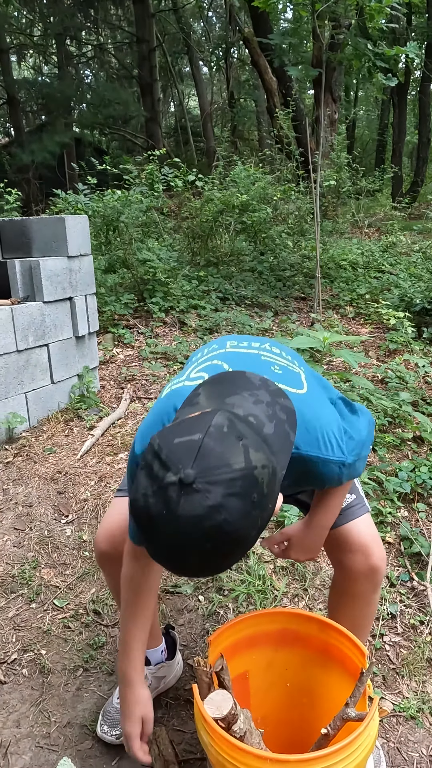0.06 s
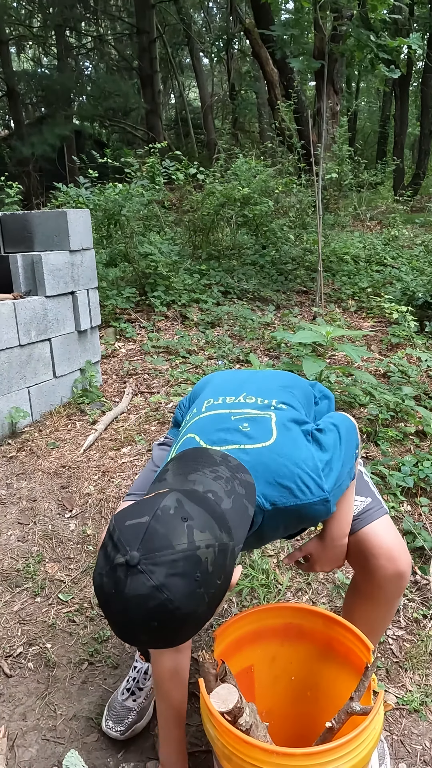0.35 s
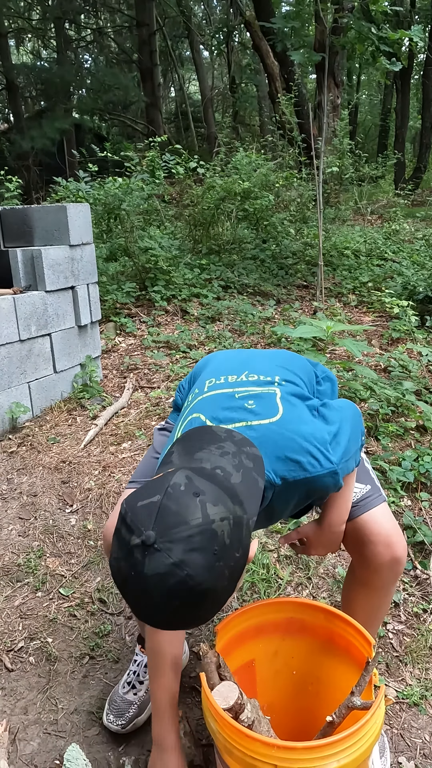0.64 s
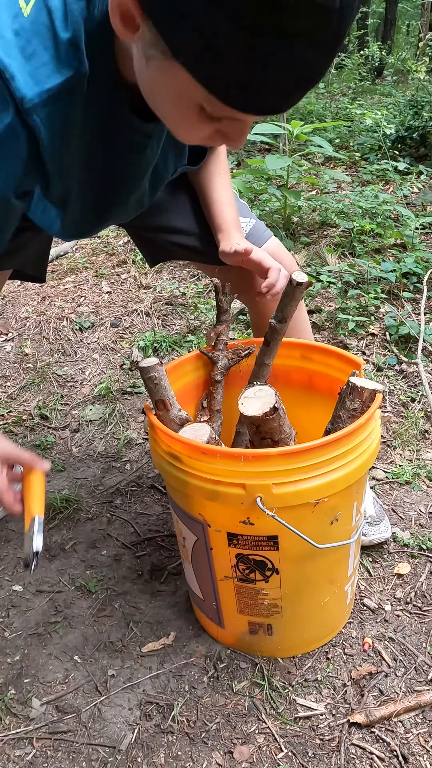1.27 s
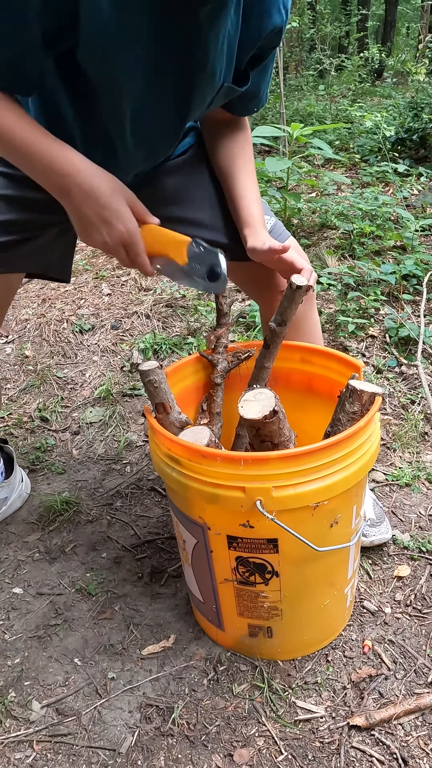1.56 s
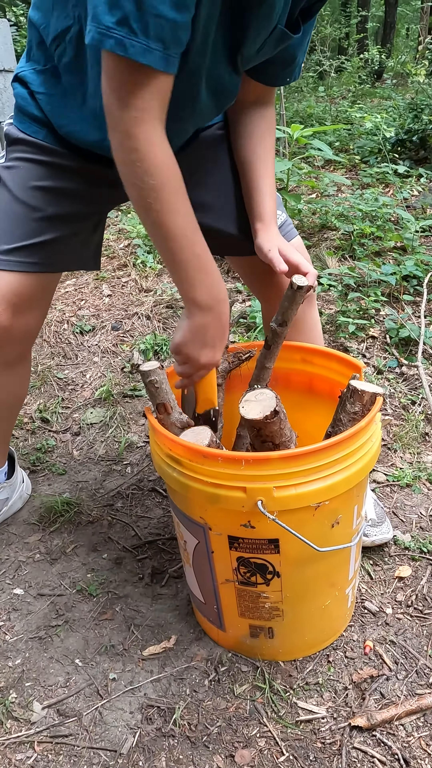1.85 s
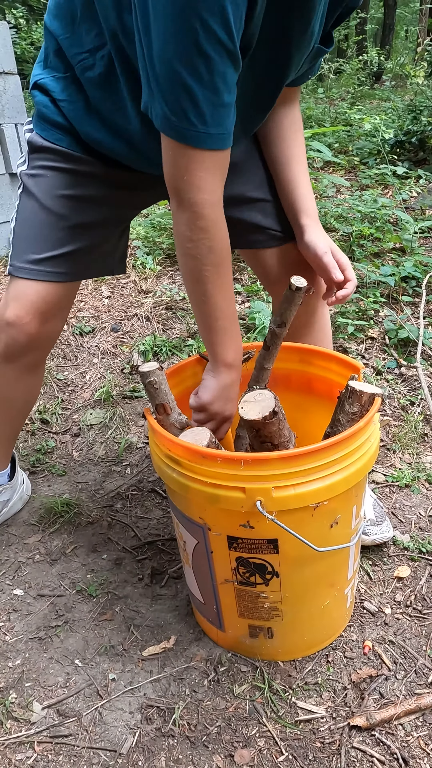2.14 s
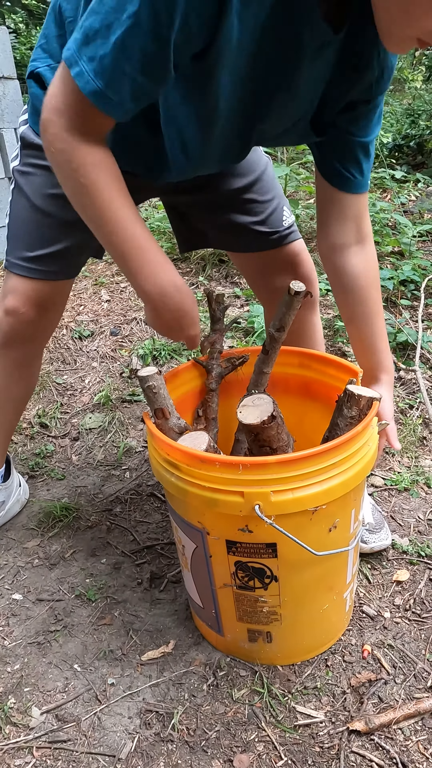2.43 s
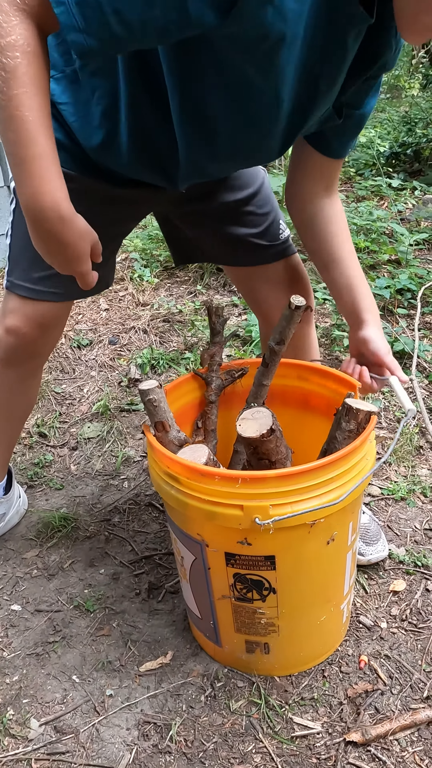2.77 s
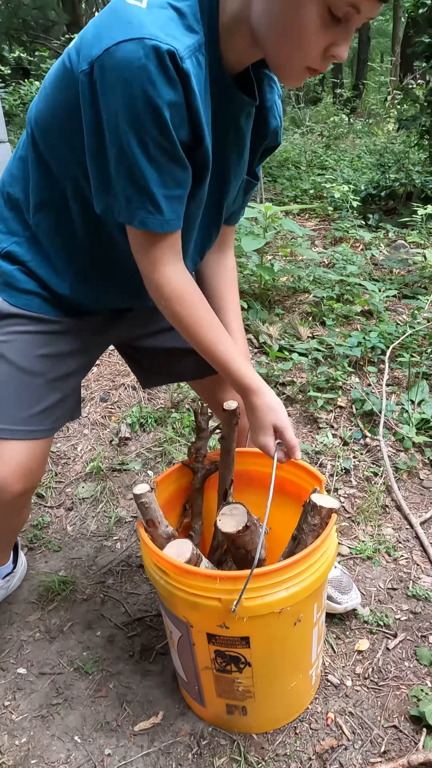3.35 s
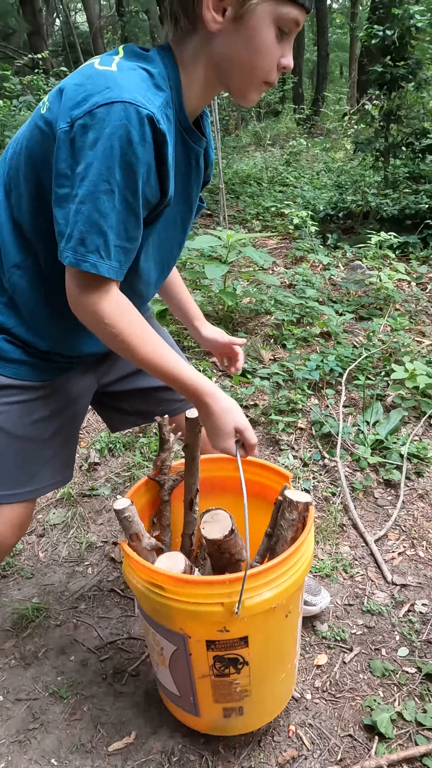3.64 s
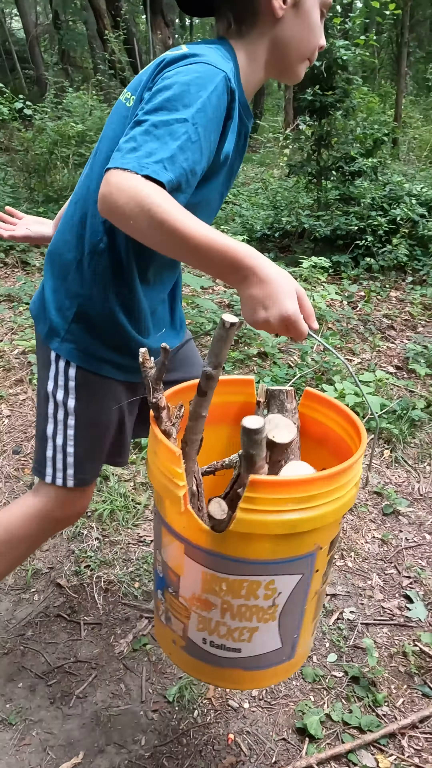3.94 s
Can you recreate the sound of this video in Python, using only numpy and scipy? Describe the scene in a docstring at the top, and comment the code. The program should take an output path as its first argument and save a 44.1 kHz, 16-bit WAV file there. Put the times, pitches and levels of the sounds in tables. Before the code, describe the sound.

Wood drops hollowly into a plastic bucket, then sticks knock, scrape and rattle the wire handle.

```python
"""Wood drops with a hollow thump into a plastic bucket on a forest floor, close to the microphone.
More cut sticks are packed in: they knock and scrape on the wall, the wire handle clatters as it is
raised, and the load shifts. Around the bucket dry leaves rustle and feet thud; one short, dry click
sounds near the end. Low wind rumbles on the microphone; farther off are a faint echo and the hush
of the woods."""
import sys
import numpy as np
from scipy import signal
from scipy.fft import rfft, irfft, next_fast_len
from scipy.io import wavfile
from scipy.ndimage import map_coordinates

SR = 44100
rng = np.random.default_rng(int(sys.argv[2]) if len(sys.argv) > 2 else 0)


def put_to_file(sound):
    """Save the sound as 16-bit audio at rate SR, in the file named by the first command-line argument."""
    columns = np.atleast_2d(sound).T  # one column per channel
    safe = np.clip(columns, -1, 1)
    whole_steps = np.round(safe * 32767)
    wavfile.write(sys.argv[1], SR, whole_steps.astype(np.int16))


N = 176400
BLOW_SAMPLES = 16384
T = np.arange(BLOW_SAMPLES) / SR

# heavy wood landing (time [s], clack [dB], tilt [dB/octave], boom [dB], chatter against clack [dB])
DROPS = [(0.037, -20.5, -5.5, -9.5, -42), (0.188, -20, -4.5, -15, -17), (.247, -39.5, -3, -24, -8),
         (.582, -33, -0.5, -21.5, -28), (.600, -42.5, 7, -19.5, -28), (2.459, -22.5, -2.5, -13, -16),
         (2.57, -23.5, -4, -17.5, -9.5)]
# sticks knocking on the wall and each other (time [s], level [dB], pitch [Hz])
KNOCKS = [(.224, -36.5, 3350), (0.615, -33.5, 3070), (2.307, -44, 2330), (2.656, -28, 1035),
          (2.709, -24.5, 2945), (2.719, -19.5, 1430), (2.879, -30.5, 1240), (2.971, -28.5, 1824),
          (3.059, -24.5, 600), (3.069, -21.5, 1323), (3.168, -38, 1700), (3.203, -37, 1630),
          (3.25, -36, 864), (3.354, -24.5, 933), (3.384, -32, 1090), (3.442, -32.5, 1764),
          (3.467, -27.5, 890), (3.476, -22, 1892), (3.586, -25, 1020), (3.886, -37.5, 1035)]
# the wire handle slipping in its sockets (time [s], level [dB])
HANDLE_SLIPS = [(2.568, -28), (2.714, -28), (2.719, -34), (2.737, -34.5), (2.756, -34.5), (2.793, -32.5),
                (2.817, -39), (2.888, -47), (2.941, -41), (2.992, -45.5), (3.083, -31.5), (3.103, -38.5),
                (3.322, -36), (3.35, -35.5)]
# sticks scraping along the wall as the load shifts (time [s], level [dB])
SCRAPE_LEVEL = [(.57, -82), (.59, -82), (.735, -43.5), (.77, -96), (2.6, -62), (2.9, -46.5), (3.28, -65),
                (3.35, -31.5), (3.54, -88)]
# strokes of rough bark (time [s], length [s], level [dB])
SCRATCHES = [(0.118, 0.032, -47), (.141, 0.036, -45), (0.492, 0.042, -52.5), (.645, 0.016, -60)]
# ticks of a tool and twigs (time [s], level [dB])
TICKS = [(2.358, -39), (2.525, -38), (2.567, -43)]
# feet on the ground (time [s], level [dB], attack [s])
FOOTFALLS = [(2.308, -18, 0.0014), (2.399, -24.5, 0.00062), (3.686, -9.5, 0.011)]
# stirring leaves and cloth, and wind on the microphone (time [s], level [dB])
RUSTLE_LEVEL = [(.18, -62), (.22, -50), (.31, -55), (.38, -63), (.55, -54), (.67, -46), (.81, -68),
                (.99, -55), (1.07, -66), (2.3, -76.5), (2.6, -61), (3.75, -57)]
WIND_LEVEL = [(2.2, -39), (2.4, -35), (3.05, -34.5)]

# modes of the hollow bucket, its wall, the wire and the ground (frequency [Hz], level [dB], t60 [s])
BOOM_MODES = [(125.4, -5.5, 0.087), (191, -8, 0.16), (221.3, -3.5, 0.26), (684.3, -20, 0.16)]
WALL_MODES = [(523, -6, 0.1), (597, -15, 0.1), (729, -7, 0.14), (882.7, 1, 0.089), (981, 3, 0.042),
              (1287, -1.5, 0.062), (1754, -2, 0.054)]
WIRE_MODES = [(2377, -7, 0.063), (2520, -9.5, 0.11), (2900, -8.5, 0.059), (3033, 0, 0.033),
              (4270, -20.5, 0.059), (4870, -11, 0.025)]
GROUND_MODES = [(33, -1, 0.12), (50, -21, 0.2), (83, 13, 0.017)]
# a stick's hard clack and its note (frequency [ratio to pitch], level [dB], t60 [s])
STICK_MODES = [(0.881, 11, 0.0068), (0.998, -0.5, 0.061)]
# how fast wooden and sharp contacts die (frequency [Hz], t60 [s])
WOOD_T60 = [(200, 0.3), (900, 0.085), (3000, 0.06), (9000, 0.033)]
SHARP_T60 = [(3000, 0.036), (10000, 0.019)]
# each source's noise spectrum at the microphone (frequency [Hz], relative level [dB])
KNOCK_COLOUR = [(380, -11), (560, -1), (850, -3.5), (1400, -0.5), (1850, -4), (2200, -10.5), (3100, -9.5),
                (4000, -19.5), (14000, -49)]
HANDLE_COLOUR = [(600, -8.5), (1500, -1.5), (3100, -2.5), (3800, -9.5), (6000, -15), (11500, -21.5),
                 (15000, -47)]
BARK_COLOUR = [(1500, -7), (4000, 5.5), (11500, -15.5), (15000, -33)]
TICK_COLOUR = [(2200, -4.5), (4000, 1), (5200, -2.5), (7500, -1.5), (9000, -14.5), (14000, -27)]
LEAF_COLOUR = [(2000, 6.5), (3500, 5), (7000, -5), (10000, -11), (14000, -27)]
WIND_COLOUR = [(10, -35), (26, 5), (55, -7.5), (80, -12.5), (130, -15.5), (200, -27.5), (500, -97.5)]
HUSH_COLOUR = [(135, 1), (290, -5.5), (420, -17.5), (1100, -17), (2000, -23), (4000, -32), (7000, -34),
               (10000, -52), (14000, -103)]

CONTACT_ATTACK_S = 0.00062
THIN_TILT_DB, NEUTRAL_HZ = 2.5, 1420  # tilt added per octave of stick pitch; pitch with none
CLICK_S, CLICK_HZ, CLICK_T60_S = 3.979, 2400, 0.0016
GRAINS_PER_S, BARK_SLIPS_PER_S, GRAIN_SPREAD_DB = 2400, 760, 4.5
CLUMPS_PER_S, CLUMP_DB, CRACKLE_SHARE = 45, 5.5, 0.46
ECHO_T60_S, ECHO_DB, HUSH_DB = 0.36, -19, -49.5
TOP_HZ = 14800


def drops():
    """Heavy wood lands close by: a clack, the bucket's hollow boom, and a chatter as it settles."""
    out = np.zeros(N)
    for s, db, tilt_db, boom_db, chatter_db in DROPS:
        clack = knock(tilt_db, wall_db=-21)
        add(out, s, amp(db) * chatter(clack, span_s=0.082, db=chatter_db, count=7))
        add(out, s, amp(boom_db) * ring(BOOM_MODES, attack_s=0.003, detune=0.013))
    return out


def knock(tilt_db, wall_db):
    """Wood on plastic: a dry clack and the ring of the wall."""
    return contact(KNOCK_COLOUR, WOOD_T60, tilt_db) + amp(wall_db) * wall()


def wall():
    """The struck plastic wall rings briefly."""
    return ring(WALL_MODES, attack_s=0.001, detune=0.004)


def chatter(blow, span_s, db, count):
    """A blow is followed by weaker contacts at chance moments."""
    fractions = (np.arange(count) + rng.random(count)) / count
    signs = np.sign(rng.standard_normal(count))
    out = blow.copy()
    for fraction, sign in zip(fractions, signs):
        add(out, fraction * span_s, amp(db) * sign * (1 - fraction / 2) * blow)
    return out


def sticks():
    """Sticks knock in the bucket, each with its own note; thin ones ring higher and brighter."""
    out = np.zeros(N)
    for s, db, hz in KNOCKS:
        modes = [(hz * ratio, mode_db, t60) for ratio, mode_db, t60 in STICK_MODES]
        note = ring(modes, attack_s=0.0004, detune=0.015)
        clack = knock(THIN_TILT_DB * np.log2(hz / NEUTRAL_HZ), wall_db=1.5)
        add(out, s, amp(db) * (amp(-5) * clack + note))
    return out


def handle():
    """Each slip of the handle clicks, rings the wire and shakes the wall."""
    out = np.zeros(N)
    for s, db in HANDLE_SLIPS:
        wire = ring(WIRE_MODES, attack_s=0.0007, detune=0.002)
        click = contact(HANDLE_COLOUR, SHARP_T60)
        add(out, s, amp(db) * (amp(-2) * click + amp(4.5) * wire + amp(2) * wall()))
    return out


def scrape():
    """Bark slips in tiny jerks that ring the wall."""
    jerks = signal.fftconvolve(grains(GRAINS_PER_S), knock(tilt_db=-0.5, wall_db=-8.5))[:N]
    return level(SCRAPE_LEVEL) * unit(jerks)


def scratches():
    """Rough bark brushes past in short, gritty strokes that swell and fade."""
    out = np.zeros(N)
    for s, length_s, db in SCRATCHES:
        stroke = np.sqrt(np.abs(np.hanning(round(length_s * SR))))
        grit = unit(coloured(grains(BARK_SLIPS_PER_S)[:BLOW_SAMPLES], BARK_COLOUR))
        add(out, s, amp(db) * stroke * grit[:len(stroke)])
    return out


def ticks():
    """A tool and twigs make hard, light contacts; one short, dry click sounds near the end."""
    out = np.zeros(N)
    for s, db in TICKS:
        add(out, s, amp(db) * contact(TICK_COLOUR, SHARP_T60))
    click = ring([(CLICK_HZ, -9, CLICK_T60_S)], attack_s=0.00026, detune=0)
    add(out, CLICK_S, click)
    return out


def footfalls():
    """Feet push on the forest floor, firmly or softly, and thud through the ground."""
    out = np.zeros(N)
    for s, db, attack_s in FOOTFALLS:
        add(out, s, amp(db) * ring(GROUND_MODES, attack_s, detune=0.05))
    return out


def leaves():
    """Dry leaves and cloth stir near the bucket: clumps of tiny crackles over a soft brushing."""
    knots = rng.standard_normal(SR // 10)
    clumps = amp(CLUMP_DB * map_coordinates(knots, [np.arange(N) / SR * CLUMPS_PER_S]))
    crackle = np.sqrt(CRACKLE_SHARE) * grains(GRAINS_PER_S)
    brushing = np.sqrt(1 - CRACKLE_SHARE) * rng.standard_normal(N)
    return level(RUSTLE_LEVEL) * unit(coloured(clumps * (crackle + brushing), LEAF_COLOUR))


def tree_echo(near):
    """The trees scatter a faint, short tail back to the microphone."""
    tail = dying_noise([(2000, ECHO_T60_S)])  # one point: all frequencies die alike
    return amp(ECHO_DB) * signal.fftconvolve(near, tail / np.linalg.norm(tail))[:N]


def wind():
    """Wind rumbles on the microphone."""
    return level(WIND_LEVEL) * unit(coloured(rng.standard_normal(N), WIND_COLOUR))


def hush():
    """The steady hush of the woods, far off."""
    return amp(HUSH_DB) * unit(coloured(rng.standard_normal(N), HUSH_COLOUR))


def contact(colour, t60s, tilt_db=0):
    """A crowd of quickly damped modes, with the energy of 10 ms at rms 1."""
    attack = 1 - np.exp(-T / CONTACT_ATTACK_S)
    burst = coloured(dying_noise(t60s) * attack, colour, tilt_db)
    return burst / np.linalg.norm(burst) * np.sqrt(SR / 100)


def ring(modes, attack_s, detune):
    """Damped modes; every blow excites them a little differently."""
    hz, db, t60 = np.transpose(modes)[:, :, None]
    strength, shift, polarity = rng.standard_normal((3, len(modes), 1))
    fade = amp(db + 2 * strength - 60 * T / t60)
    tones = np.sign(polarity) * np.sin(2 * np.pi * hz * (1 + detune * shift) * T)
    return (fade * tones).sum(0) * (1 - np.exp(-T / attack_s))


def grains(per_s):
    """Tiny slips at random moments, a few of them stronger; rms 1."""
    sizes = amp(GRAIN_SPREAD_DB * np.minimum(rng.exponential(size=N), 4))
    slips = rng.random(N) < per_s / SR
    return unit(slips * rng.choice([-1, 1], N) * sizes)


def dying_noise(t60s):
    """Noise in which each frequency dies at its own speed."""
    hz, t, spectra = signal.stft(rng.standard_normal(BLOW_SAMPLES), SR, nperseg=128)
    fade = amp(-60 * t / along(t60s, hz)[:, None])
    return signal.istft(spectra * fade, SR)[1][:BLOW_SAMPLES]


def coloured(x, colour, tilt_db=0):
    """Causal filter from (frequency [Hz], level [dB]) points, tilted in dB per octave."""
    size = 2 * next_fast_len(len(x))
    hz = np.fft.rfftfreq(size, 1 / SR)
    octaves = np.log2(np.clip(hz, 300, 6000) / 1000)
    cepstrum = irfft(np.log(amp(along(colour, hz) + tilt_db * octaves)))
    cepstrum[1:size // 2] *= 2  # fold to minimum phase: nothing sounds ahead of a blow
    cepstrum[size // 2 + 1:] = 0
    return irfft(rfft(x, size) * np.exp(rfft(cepstrum)))[:len(x)]


def amp(db):
    """Decibels to gain."""
    return 10 ** (np.asarray(db) / 20)


def unit(x):
    """Scale to rms 1."""
    return x / np.sqrt(np.mean(x ** 2) + 1e-20)


def along(points, hz):
    """Read (frequency [Hz], value) points on a log axis."""
    point_hz, values = np.transpose(points)
    return np.interp(np.log(hz + 1), np.log(point_hz), values)


def level(points):
    """Gain for each sample from (time [s], level [dB]) points."""
    return amp(np.interp(np.arange(N) / SR, *np.transpose(points)))


def add(track, s, sound):
    """Mix a sound into the track at a time."""
    part = track[round(s * SR):][:len(sound)]
    part += sound[:len(part)]


def scene():
    """One microphone close to the bucket, with the woods all around."""
    near = drops() + sticks() + handle() + ticks() + scrape() + scratches() + leaves()
    return (near + tree_echo(near) + footfalls() + hush() + wind())[None]


def record(dry):
    """The camera's microphone channel keeps nothing above its band limit."""
    lowpass = signal.ellip(10, 0.1, 90, TOP_HZ, fs=SR, output="sos")
    return signal.sosfilt(lowpass, dry)


dry = scene()
out = record(dry)
put_to_file(out)
```